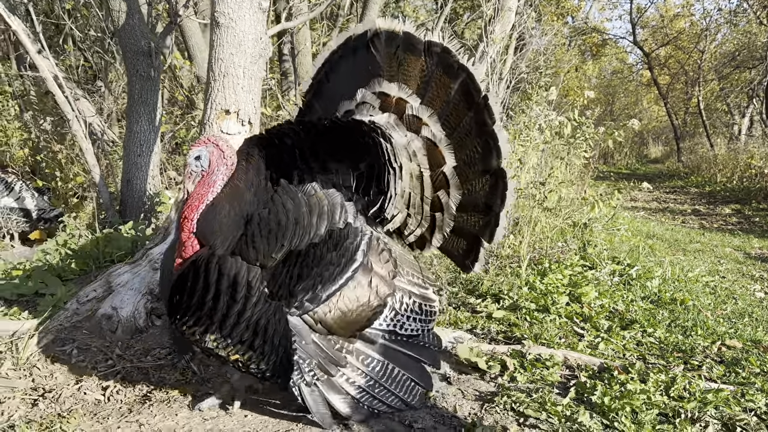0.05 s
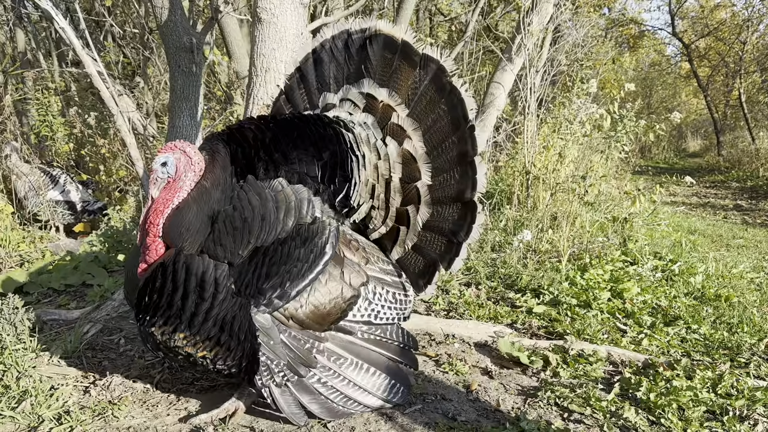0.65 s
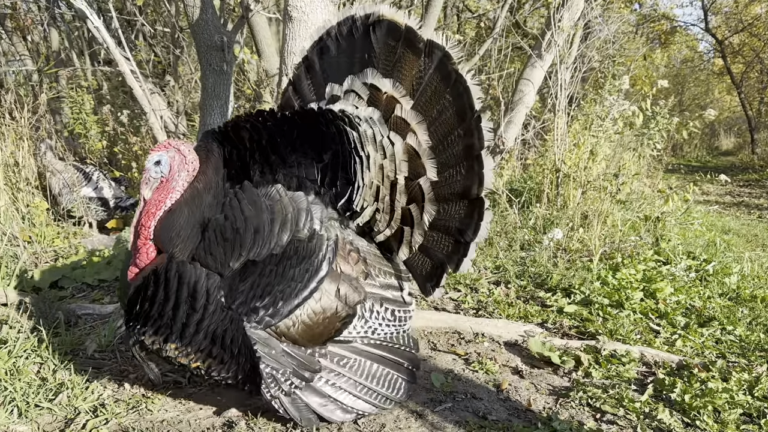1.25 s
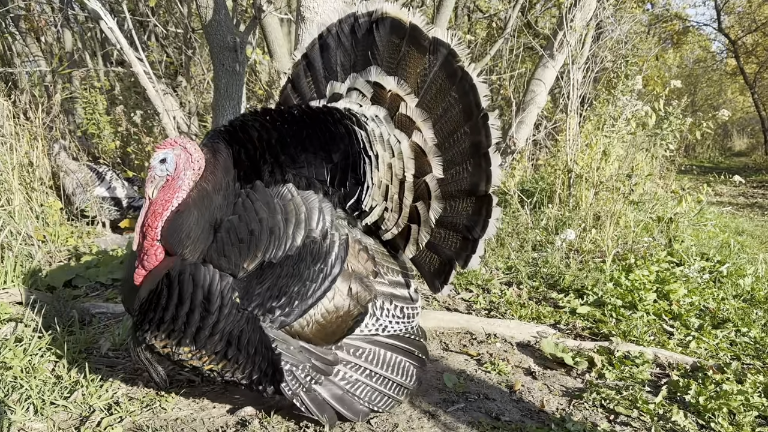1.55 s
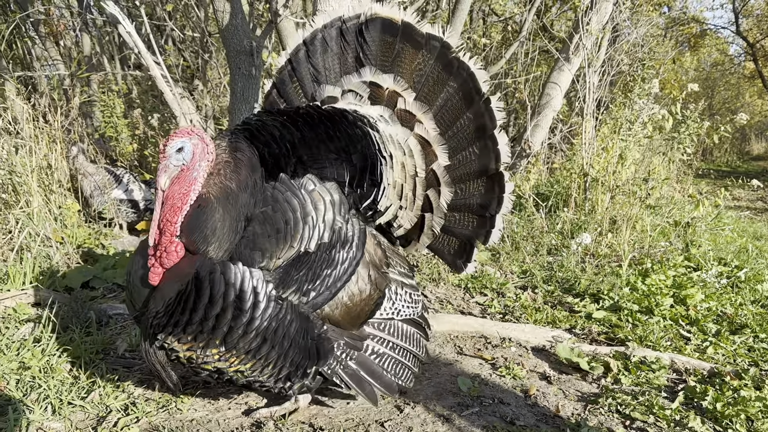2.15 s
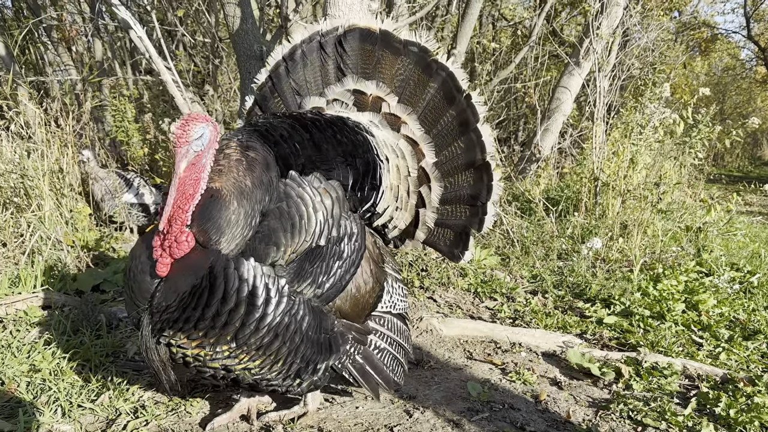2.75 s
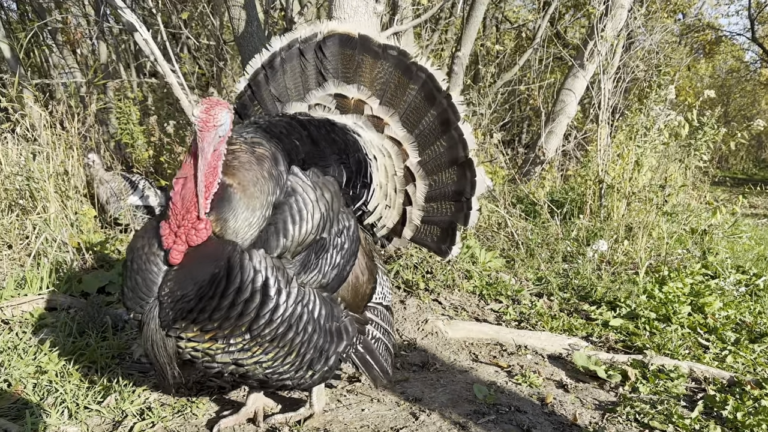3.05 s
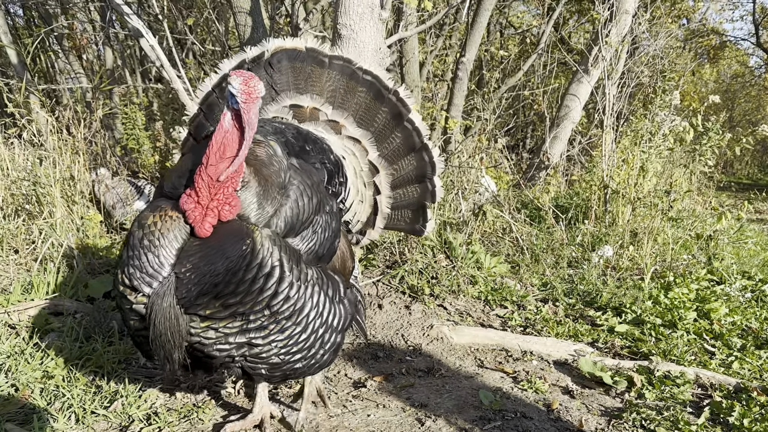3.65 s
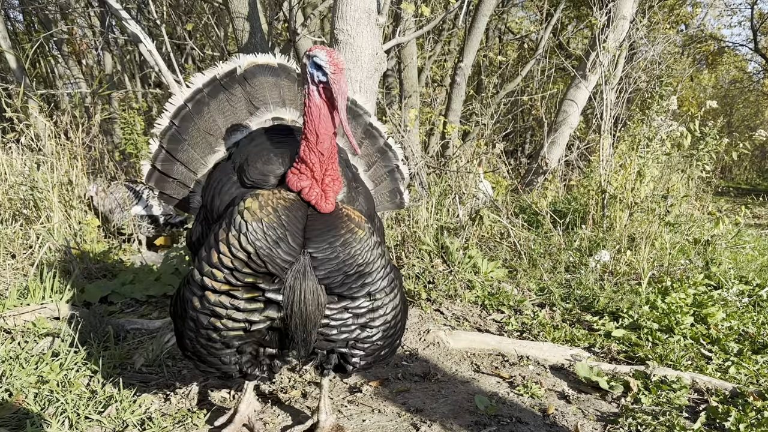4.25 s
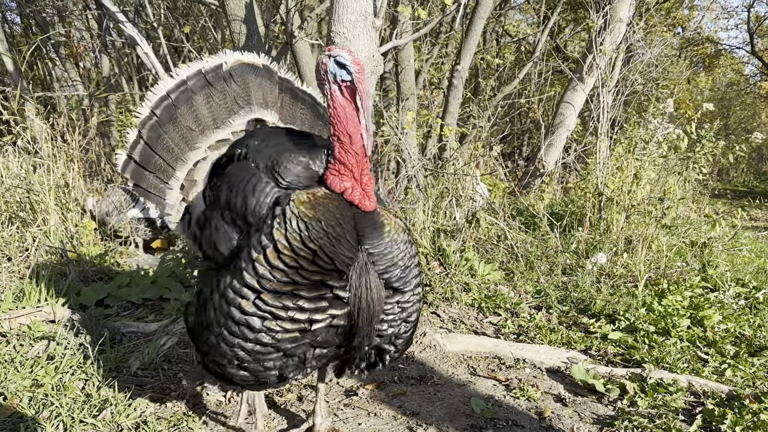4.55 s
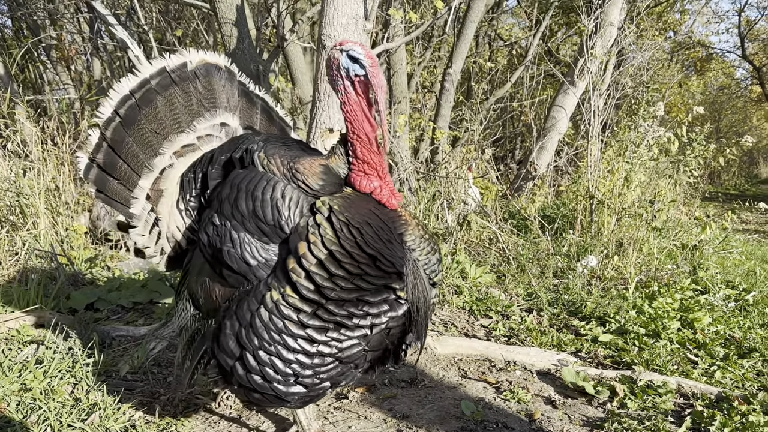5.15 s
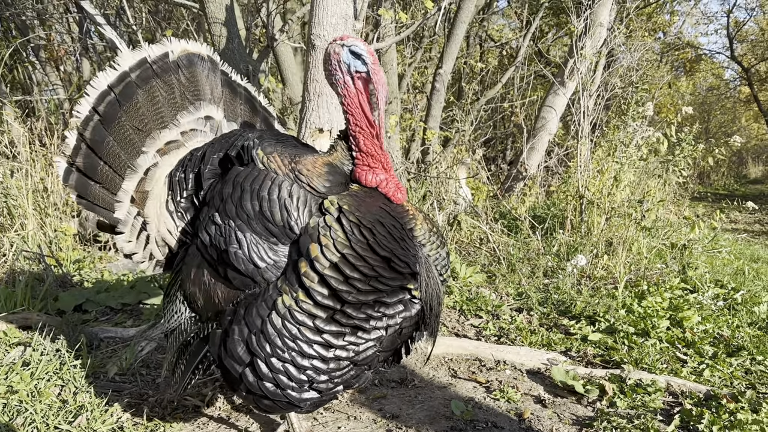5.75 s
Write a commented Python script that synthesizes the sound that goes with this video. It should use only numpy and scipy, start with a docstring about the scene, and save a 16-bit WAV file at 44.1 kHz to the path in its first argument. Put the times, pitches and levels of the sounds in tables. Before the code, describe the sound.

A low, distant rumble runs throughout at the edge of a wood, with very faint leaf hiss, far bird chirps and high, pulsing insects. At about 0.2 seconds a nearby male turkey spits: a brief hiss on a deep chest thump. His feathers rustle, a foot scrapes dry soil around 0.4 to 0.7 seconds, and dry litter ticks. From 0.6 to 1.8 seconds his chest drums a very low hum that swells and rises near its end. A twig snaps sharply at 1.3 seconds. Then he gives five runs of three to six short, hoarse notes, starting at about 2.4, 3.1, 3.8, 4.7 and 5.5 seconds. Each run lasts under half a second and tends to grow louder and lower. The first is soft, and the later ones are the most prominent sounds. The trees add a slight, short echo to the notes and ticks.

```python
"""A turkey tom struts at a wood's edge, over distant rumble, leaf hiss, faint chirps and insects.
First he spits (a hiss on a deep chest thump); feathers rustle, a foot scrapes, dry litter ticks.
From 0.6 s his inflated chest drums a low, rising hum, and a twig snaps at 1.3 s.
From 2.4 s come five runs of short, hoarse notes: a membrane in the throat swings softly, breaks
into a loud core, then shuts. The trees scatter the notes and ticks."""
import sys
import numpy as np
from scipy import signal
from scipy.fft import rfft, irfft, next_fast_len
from scipy.io import wavfile
from scipy.ndimage import map_coordinates

SR = 44100
rng = np.random.default_rng(int(sys.argv[2]) if len(sys.argv) > 2 else 0)


def store_wav(level_fs):
    """Save 16-bit WAV to argv[1]."""
    pcm = np.round(np.clip(np.atleast_2d(level_fs), -1, 1) * 32767)
    wavfile.write(sys.argv[1], SR, pcm.T.astype(np.int16))


N = 265038
TIME = np.arange(N) / SR

# bird's position, left over right: f/Hz, level/dB
BIRD_BALANCE = [(400, 1), (700, 3.4), (1300, 2.5), (2400, 2.6), (4400, 3.5), (8000, 3)]
# bird's position, left ahead of right: f/Hz, phase/rad
BIRD_PHASE = [(300, .1), (650, 0.15), (1200, 0.26), (1640, 1.3), (2000, 0.44), (2840, 1.7), (4500, 0.51),
              (8000, 2.1)]


def amp(db):
    """dB to gain."""
    return 10 ** (np.asarray(db) / 20)


def along(points, hz):
    """Interpolate (f/Hz, value) points on a log axis."""
    f, values = np.transpose(points)
    return np.interp(np.log(hz + 1), np.log(f + 1), values)


def curves(rows):
    """One per-sample curve for each column after t/s."""
    times_s, *columns = np.transpose(rows)
    return [np.interp(TIME, times_s, column) for column in columns]


def wobble(rate_hz, size=N):
    """Smooth random curve through unit-variance knots."""
    knots = rng.standard_normal(int(size * rate_hz / SR) + 4)
    steps = np.arange(0, len(knots) - 1, .2)
    return np.interp(np.arange(size) * rate_hz / SR, steps, map_coordinates(knots, [steps]))


def envelope(peak_s, db, attack_s, release_s, hold_s=0, sag_db_per_s=0):
    """Gain: up 60 dB in attack_s, sagging while held, down 60 dB in release_s."""
    t = TIME - peak_s
    attack_db = 60 * np.maximum(-t, 0) / attack_s
    release_db = 60 * np.maximum(t - hold_s, 0) / release_s
    return amp(db - attack_db - sag_db_per_s * np.clip(t, 0, hold_s) - release_db)


def filtered(x, response):
    """Apply a frequency response."""
    size = x.shape[-1]
    padded = next_fast_len(size + 4096)
    return irfft(rfft(x, padded) * response(np.fft.rfftfreq(padded, 1 / SR)), padded)[..., :size]


def noise(colour, size=N):
    """Coloured mono noise, rms 1."""
    x = filtered(rng.standard_normal(size), lambda hz: amp(along(colour, hz)))
    return x / np.sqrt(np.mean(x ** 2) + 1e-20)


def stereo_noise(colour):
    """Coloured noise, near mono in the bass, wide in the treble."""
    # left-right likeness: f/Hz, correlation
    coherence = [(60, 1), (130, 0.96), (290, 0.71), (700, 0.58), (1300, 0.01), (2400, 0.67), (4400, 0.25),
                 (7000, -0.0097), (15000, 0.042)]
    size = next_fast_len(N)
    hz = np.fft.rfftfreq(size, 1 / SR)
    width_rad = np.arccos(np.clip(along(coherence, hz), -1, 1)) / 2
    spectra = rfft(rng.standard_normal((2, size))) * amp(along(colour, hz))
    mid, side = irfft(spectra * [np.cos(width_rad), np.sin(width_rad)], size)[:, :N]
    return np.array([mid + side, mid - side]) / np.std(mid)


def add(track, start_s, sound):
    """Mix a sound into a track."""
    start = max(round(start_s * SR), 0)
    track[start:start + len(sound)] += sound[:N - start]


def placed(x, balance, phase):
    """Pan off centre by level and phase per frequency."""
    side = np.array([[.5], [-.5]])
    return filtered(x, lambda hz: amp(side * along(balance, hz)) * np.exp(1j * side * along(phase, hz)))


def whistle(length_s, start_hz, end_hz, db, warble):
    """Thin gliding tone that swells and fades."""
    size = int(length_s * SR)
    pitch_hz = np.linspace(start_hz, end_hz, size) * (1 + warble * wobble(430, size))
    return amp(db) * np.hanning(size) * np.sin(2 * np.pi * np.cumsum(pitch_hz) / SR)


def grainy_bursts(bursts, colour, grain_db, grain_hz):
    """Noise bursts with a flickering level."""
    gain = sum(envelope(*burst) for burst in bursts)
    return gain * amp(grain_db * wobble(grain_hz)) * stereo_noise(colour)


def outdoors():
    """Distant rumble, faint hum, open air and leaf hiss."""
    # rumble's swell and ebb: t/s, level/dB
    swell = [(0, -43.5), (1.6, -42.5), (2.25, -45.5), (2.8, -43.5), (4.2, -43.5), (6.0, -45.5)]
    # spectra: f/Hz, level/dB
    rumble_colour = [(13, -63), (22, -24), (37, -16), (53, -4), (72, -3), (91, 1.5), (124, -7.5),
                     (160, -12), (184, -12), (200, -25), (250, -19.5), (283, -29.5), (341, -26),
                     (420, -50.5), (550, -75.5), (920, -120)]
    air_colour = [(220, -34.5), (380, -6.5), (519, -5.5), (560, -1.5), (673, -4.5), (808, -8.5), (1060, -9),
                  (2070, -10), (2530, -20), (3080, -19), (5000, -24), (6500, -53), (11000, -120)]
    leaf_colour = [(3000, -25.5), (4800, -13.5), (6000, -1.5), (7200, 1.5), (8300, -6.5), (9200, -15),
                   (11500, -26), (14500, -15.5), (16000, -23.5)]
    rumble = amp(curves(swell)[0] + .75 * wobble(6.1)) * stereo_noise(rumble_colour)
    hum = amp(-67 + 1.4 * wobble(3.1)) * np.sin(2 * np.pi * 261 * TIME + .54 * wobble(4.1))
    air = amp(-66.5 + .19 * wobble(5.8)) * stereo_noise(air_colour)
    leaves = amp(-76 + .5 * wobble(2.4)) * stereo_noise(leaf_colour)
    return rumble + hum + air + leaves


def far_chirps(bird_fall=.053):
    """Faint far-off tones and falling bird chirps."""
    # tones: t/s, length/s, start f/Hz, end f/Hz, level/dB
    tones = [(1.05, 0.52, 443.7, 452, -64), (1.6, 0.55, 582, 590, -65), (4.552, 1.4, 681, 664, -66.5)]
    # chirps: t/s, length/s, start f/Hz, level/dB
    birds = [(1.333, 0.102, 3420, -71.5), (1.411, .16, 3200, -71), (1.6, .1, 4450, -74),
             (2.955, 0.16, 4440, -73.5), (3.682, 0.095, 3110, -68.5), (5.382, 0.097, 4560, -77),
             (5.88, .1, 4450, -79)]
    track = np.zeros(N)
    for start_s, *shape in tones:
        add(track, start_s, whistle(*shape, warble=.0087))
    for start_s, length_s, hz, db in birds:
        add(track, start_s, whistle(length_s, hz, hz * (1 - bird_fall), db, warble=.032))
    return track


def cricket(first_s=1.74, period_s=.438):
    """One cricket, chirping evenly."""
    track = np.zeros(N)
    for start_s in np.arange(first_s, N / SR, period_s):
        add(track, start_s, whistle(.13, 8200, 8190, db=rng.normal(-79, .5), warble=.018))
    return track


def grass_insect(first_s=.755, period_s=.442, width_s=.031, return_db=-7):
    """High, faint rasp: strong wing strokes alternate with weak returns."""
    colour = [(7000, -33.5), (9500, -2), (12000, -2), (15500, -5.5)]  # f/Hz, level/dB
    strokes = np.zeros(N)
    for i in range(19):
        peak_s = first_s + i * period_s / 2
        strokes += amp(return_db * (i % 2)) * np.exp(-((TIME - peak_s) / width_s) ** 2)
    return amp(-79 + 2.7 * wobble(200)) * strokes * stereo_noise(colour)


def tree_echo(x, near_db=-21, near_t60_s=.093, far_db=-30):
    """Ground and near trunks scatter at once; the wood answers faintly."""
    # the wood's decay: f/Hz, t60/s
    decay = [(200, .25), (700, .3), (2000, 0.14), (10000, 0.08)]
    hz, t, spectra = signal.stft(rng.standard_normal((2, SR // 2)), SR, nperseg=256)
    far = signal.istft(spectra * amp(-60 * t / along(decay, hz)[:, None]), SR, nperseg=256)[1]
    age_s = np.arange(far.shape[1]) / SR
    near = rng.standard_normal(far.shape) * amp(-60 * age_s / near_t60_s) * (age_s > .002)
    impulse = amp(near_db) * near / np.linalg.norm(near[0]) + amp(far_db) * far / np.linalg.norm(far[0])
    return signal.fftconvolve(x, impulse, axes=1)[:, :N]


def feathers():
    """Plumage rustles as the fan shakes out."""
    # bursts: peak t/s, level/dB, attack/s, release/s
    rustles = [(.28, -47.5, 2.07, 1.58), (.7, -63.5, 0.8, 1.2), (1.3, -66, 2.5, 3)]
    # rustle spectrum: f/Hz, level/dB
    colour = [(88, -38), (150, -2.5), (291, -1), (368, -11.5), (634, -11), (1470, -30), (3070, -28.5),
              (8310, -39), (11100, -49.5), (15800, -40)]
    return grainy_bursts(rustles, colour, grain_db=3.13, grain_hz=110)


def high_rasps():
    """Two faint swells of hiss, then the high, breathy rasp of the loud turkey note at 5.6 s."""
    # bursts: peak t/s, level/dB, attack/s, release/s
    rasps = [(3.2, -72.5, 1.2, 1.0), (4.82, -76, 0.77, 1.2), (5.622, -63, .04, .05)]
    # hiss spectrum: f/Hz, level/dB
    colour = [(1500, -35.5), (3500, 5.5), (4500, -5), (5700, 4.5), (7000, -8.5), (12000, -29)]
    return grainy_bursts(rasps, colour, grain_db=4, grain_hz=70)


def foot_scrape():
    """A foot scrapes dry soil."""
    # strokes: peak t/s, level/dB, attack/s, release/s
    scrapes = [(.43, -49.5, 0.054, 0.089), (.665, -55.5, 0.097, 0.49)]
    # soil spectrum: f/Hz, level/dB
    colour = [(150, -29), (250, -1.5), (385, -6.5), (853, -7), (1470, -22), (3160, -25), (4870, -39),
              (7000, -43), (9100, -66), (15400, -120)]
    return grainy_bursts(scrapes, colour, grain_db=3, grain_hz=149.9)


def litter(faint_per_s=1.7, faint_db=-61, spread_db=3):
    """Dry litter and twigs crack underfoot, each with a dull ground knock."""
    # clearest ticks: t/s, level/dB, t60/s, knock re tick/dB
    ticks = [(.300, -52.5, 0.1, -8), (.429, -57.5, 0.012, 13), (.523, -53.5, .03, -12),
             (.564, -43.5, 0.0058, -2.5), (1.338, -39, 0.0085, 1), (1.598, -59, .015, 13),
             (2.05, -59, .015, -5), (4.238, -56, 0.0075, 5), (4.266, -56, 0.024, -12)]
    # crack spectrum: f/Hz, level/dB
    colour = [(400, -7.5), (2000, -1), (4200, -5.5), (6200, -2.5), (9000, -12), (16000, -20)]
    # ground modes: f/Hz, level/dB, t60/s
    modes = [(158, 6, 0.03), (543, -0.5, 0.018), (1740, -7.5, .015)]
    track, size = np.zeros(N), SR // 8
    t = np.arange(size) / SR
    knock = sum(amp(db - 60 * t / t60_s) * np.sin(2 * np.pi * hz * t) for hz, db, t60_s in modes)
    faint_ticks = [(when * N / SR, faint_db + spread_db * (2 * force - 1), .015, -4)
                   for when, force in rng.random((int(faint_per_s * N / SR), 2))]
    for start_s, db, t60_s, knock_db in list(ticks) + faint_ticks:
        crack = noise(colour, size) * amp(-60 * t / t60_s)
        add(track, start_s, amp(db) * (crack + amp(knock_db) * knock))
    return placed(track, BIRD_BALANCE, BIRD_PHASE)


def chest(pitch_hz, waver_db):
    """The inflated chest hums a very low, almost pure tone."""
    phase = 2 * np.pi * np.cumsum(pitch_hz * np.ones(N)) / SR
    return np.sqrt(2) * amp(waver_db * wobble(14)) * np.sin(phase)


def spit():
    """A spat hiss over a chest thump."""
    # hiss spectrum: f/Hz, level/dB
    colour = [(290, -47), (500, -13.5), (1110, -13), (1260, -18.5), (1840, -2.5), (2250, -11), (2750, -1),
              (3130, -14.5), (4370, -15.5), (6450, -7), (7670, -18), (9950, -11), (11200, -39),
              (12700, -20), (15800, -13)]
    # left over right: f/Hz, level/dB
    balance = [(500, -2), (2000, 5), (4500, 5), (9000, -1)]
    # left ahead of right: f/Hz, phase/rad
    phase = [(500, .3), (1500, 0.97), (2500, 1.4), (4400, 0.55), (8000, 1.2), (15000, 1.1)]
    burst = envelope(.2083, db=-36, attack_s=.02, release_s=.049, hold_s=.048, sag_db_per_s=168.5)
    hiss = burst * amp(.8 * wobble(270)) * noise(colour)
    thump = envelope(.255, db=-21.5, attack_s=.16, release_s=.19) * chest(pitch_hz=71.6, waver_db=0)
    return placed(hiss, balance, phase) + thump


def drum(trim_db=-2, fade_s=.12):
    """The chest's hum swells unevenly and ends higher."""
    # hum contour: t/s, f/Hz, level before trim/dB
    contour = [(0.6, 58.8, -37), (0.746, 58.3, -49), (0.95, 64.4, -43), (1.152, 60.6, -47),
               (1.244, 53.1, -41), (1.396, 53.3, -41.5), (1.47, 56.3, -32), (1.7, 71.94, -33),
               (1.85, 72.4, -54)]
    pitch_hz, level_db = curves(contour)
    fade = np.clip(np.minimum(TIME - contour[0][0], contour[-1][0] - TIME) / fade_s, 0, 1)
    return fade * amp(level_db + trim_db) * chest(pitch_hz, waver_db=1.3)


def note(onset_s, lead_s, core_s, core_db, onset_hz, core_hz, bright_db, snap):
    """The membrane swings harder and brighter at the break, then rattles upward as it shuts."""
    # throat response to a partial: f/Hz, level/dB
    throat = [(500, -8.5), (640, 4.5), (900, -2.5), (1080, 1), (1220, -8.5), (1400, -12.5), (1750, -19.5),
              (2000, -20), (2250, -33.5), (2600, -26.5), (3100, -35), (3900, -47), (5000, -62.5),
              (9000, -70)]
    # escaping air: f/Hz, level/dB
    rasp = [(300, -42.5), (800, -11), (1350, 9), (2000, -16), (3000, -12.5), (3900, -19.5), (5200, -30.5),
            (9500, -37), (12000, -63.5)]
    soft_db, loud_db = -50.5, -23
    shut_s, snap_width_s, flutter_hz = .01, .0027, 112
    ring_hz, ring_t60_s = 1350, .043
    effort = np.clip((core_db - soft_db) / (loud_db - soft_db), 0, 1)
    size = SR // 10
    t = onset_s - .007 + np.arange(size) / SR
    break_s = onset_s + lead_s
    close_s = break_s + core_s
    middle_s = (break_s + close_s) / 2
    since_close_s = np.maximum(t - close_s, 0)
    shutting = snap * np.exp(-((t - close_s) / snap_width_s) ** 2)

    lead_db = core_db + .5 - 14.5 * effort
    knots_s, knots_db = np.transpose([
        (t[0], lead_db - 36), (onset_s, lead_db - 1.5), (break_s - .006, lead_db + .5),
        (break_s - .003, lead_db - 2), (break_s + .002, core_db - 3.5), (middle_s, core_db),
        (close_s, core_db - 8), (close_s + shut_s, core_db - 25.5), (close_s + 2 * shut_s, -110)])
    level_db = np.interp(t, np.maximum.accumulate(knots_s), knots_db)
    level_db += 6 * shutting  # the snap kicks the last pulses

    break_hz = core_hz * 1.03 * max(onset_hz / core_hz, 1) ** .2
    close_hz = core_hz * (1 + .12 * snap - .04 * (1 - effort))
    flick_hz = close_hz * (1 + 1.2 * snap * (1 - .9 * effort))  # effort holds the flick back
    pitch_hz = np.interp(t, [onset_s, break_s, middle_s, close_s, close_s + .79 * shut_s],
                         [onset_hz, break_hz, core_hz, close_hz, flick_hz])
    jitter = (.017 + .092 * shutting) * wobble(720, size)
    pitch_hz *= np.exp(jitter)
    phase = 2 * np.pi * np.cumsum(pitch_hz) / SR

    harmonic = np.arange(1, 9)[:, None]
    softness = np.clip((core_db - level_db) / 10, 0, 1) * (t < middle_s)
    overtones_db = bright_db - 6 * softness + 7 * shutting
    # the narrowing throat sweeps its resonances upward
    lift = 1 + .9 * snap * np.minimum(since_close_s / shut_s, 1)
    partials = amp(along(throat, harmonic * pitch_hz / lift) + (harmonic > 1) * overtones_db)
    tone = -np.sqrt(2) * np.sum(partials * np.cos(harmonic * phase), 0) / np.linalg.norm(partials, axis=0)

    puffs = noise(rasp, size) * (1 - np.cos(phase))  # air escapes once a cycle
    air_gain = amp(-31.5 + 14 * effort - 9 * snap) + amp(-11) * shutting
    flutter = 1 - .36 * effort * (1 - snap) * np.cos(2 * np.pi * flutter_hz * (t - break_s))
    # the snap leaves the windpipe ringing
    ring_gain = snap * amp(core_db - 11 - 60 * since_close_s / ring_t60_s)
    ring = ring_gain * np.sin(2 * np.pi * ring_hz * since_close_s)
    return t[0], ring + amp(level_db) * flutter * (tone + air_gain * puffs)


def calls():
    """Five runs of hoarse notes, each tending louder and lower."""
    # notes: t/s, lead/s, core/s, level/dB, onset f/Hz, core f/Hz, overtones/dB, closing snap/0-1
    notes = [ (2.398, .012, .034, -50, 970, 770, -3, .02), (2.534, .006, .012, -44, 840, 730, -9, .02),
             (2.558, .004, .015, -43.5, 829, 840, -6, .02), (2.65, 0.012, 0.0051, -37, 630, 782, -2, 0.73),
             (2.750, 0.0064, .013, -36.5, 773, 774, -8.5, .8), (3.08, .007, 0.025, -40, 605, 922, 1, 0.05),
             (3.184, 0.015, 0.02, -27.5, 828, 629, 1, 0.16),
             (3.287, 0.013, 0.015, -29.5, 648, 682, 0.5, 0.97),
             (3.369, 0.0072, 0.018, -26.5, 644, 543, -5.5, 1),
             (3.835, 0.0053, 0.022, -35.5, 1032, 887, 14, 0),
             (3.945, 0.017, 0.019, -29, 814, 629.5, 0, .15),
             (4.059, 0.011, 0.014, -34.5, 823, 801, 6, 0.98),
             (4.139, 0.0098, .015, -24.5, 637, 590.5, 2, 0.5),
             (4.675, 0.0083, 0.037, -45.5, 918, 806, 5.5, 0.38),
             (4.799, .011, .027, -34, 883, 630, -4, .45),
             (4.903, 0.014, 0.014, -24.5, 594, 590, -1.5, 0.41),
             (4.979, .015, .017, -23, 667, 557.5, -1.5, 0.84),
             (5.059, 0.0068, 0.014, -30, 596, 596, -3, 0.8),
             (5.116, 0.0035, .005, -47.5, 626, 518, -17, .02), (5.491, .005, 0.017, -43, 903, 865, 7, 0.07),
             (5.595, .017, 0.018, -26.5, 848, 545.6, -5.5, 0),
             (5.702, 0.02, 0.0078, -32, 697, 693, 2.5, .8),
             (5.779, 0.017, 0.012, -24.5, 608.7, 560, -2.5, 0.66)]
    track = np.zeros(N)
    for row in notes:
        add(track, *note(*row))
    return placed(track, BIRD_BALANCE, BIRD_PHASE)


def scene():
    """The tom and his surroundings."""
    near = calls() + litter()
    turkey = near + tree_echo(near) + spit() + drum() + feathers() + high_rasps() + foot_scrape()
    return turkey + far_chirps() + cricket() + grass_insect() + outdoors()


def record(dry):
    """Brick-wall low-pass at 15.8 kHz."""
    return filtered(dry, lambda hz: hz < 15800)


dry = scene()
out = record(dry)
store_wav(out)
```